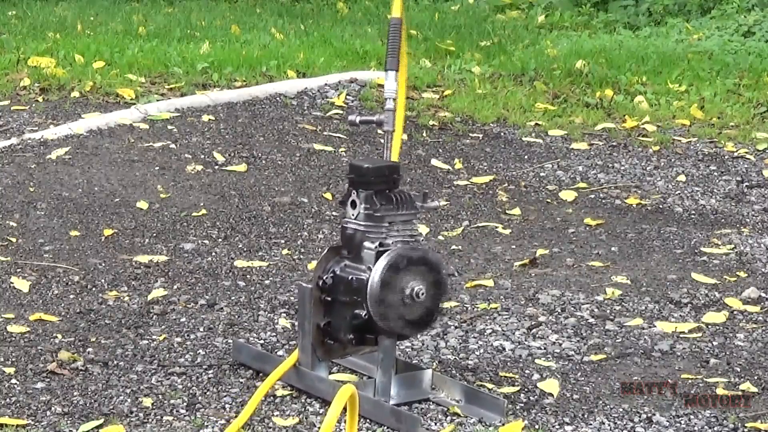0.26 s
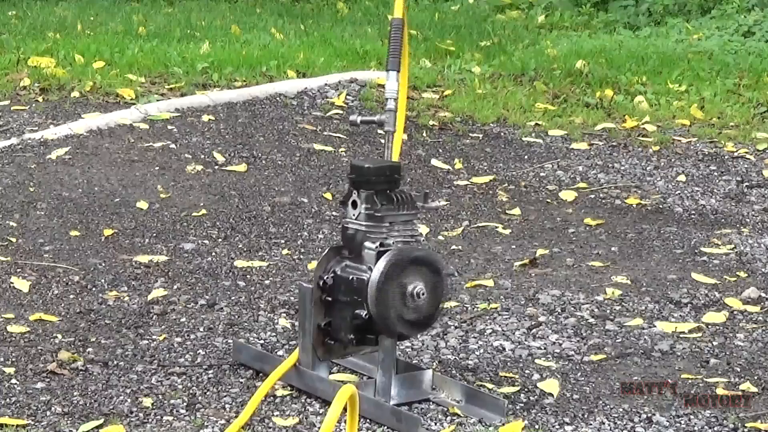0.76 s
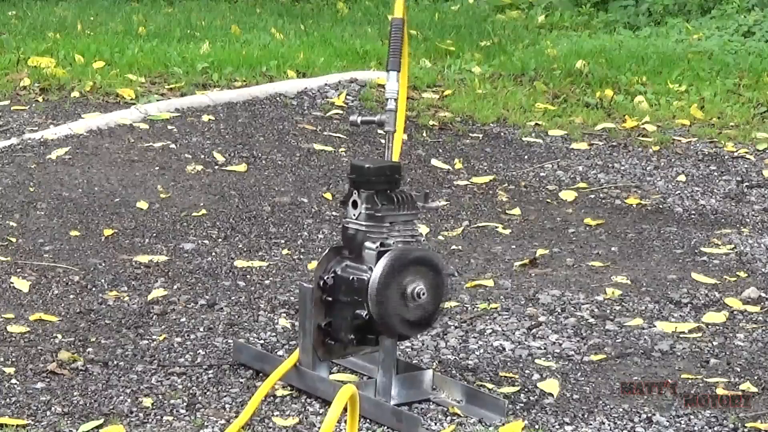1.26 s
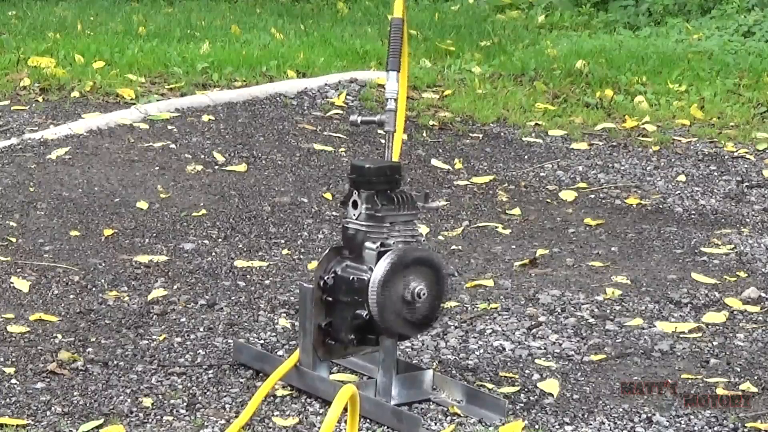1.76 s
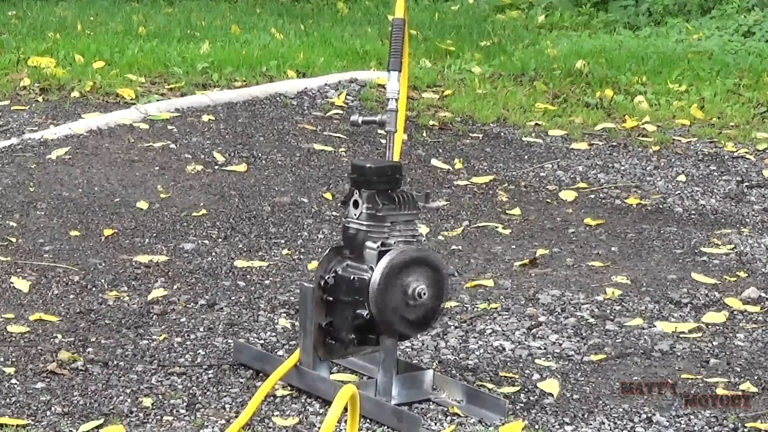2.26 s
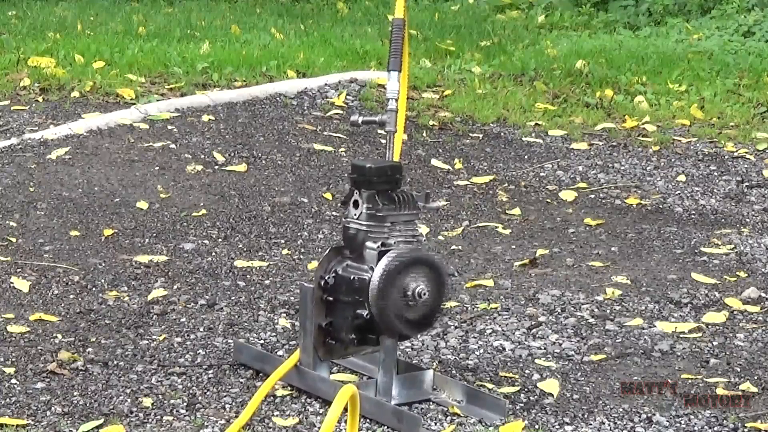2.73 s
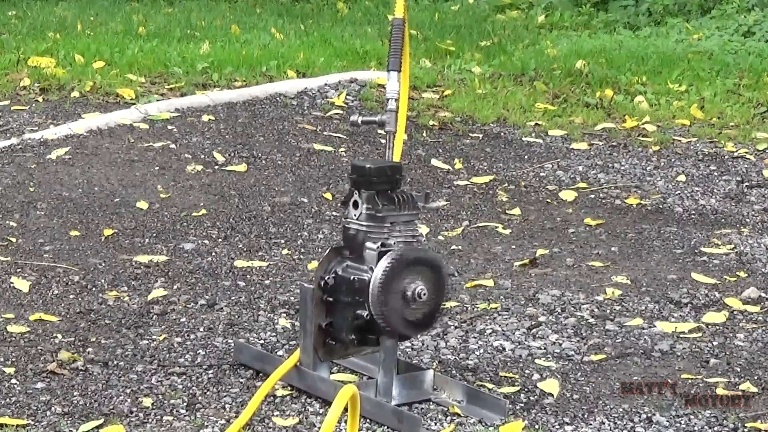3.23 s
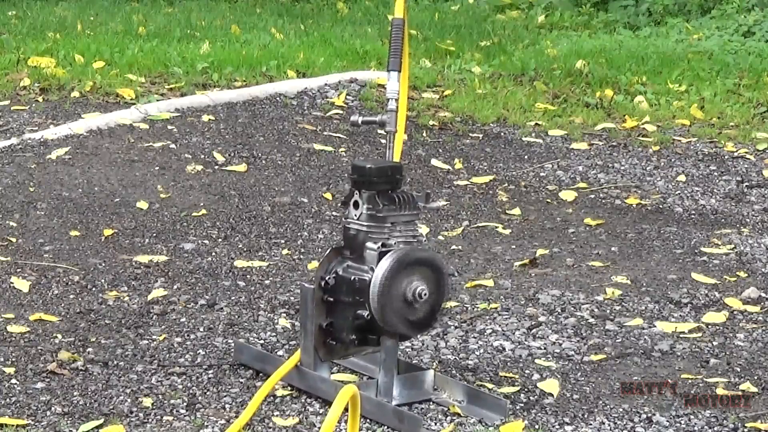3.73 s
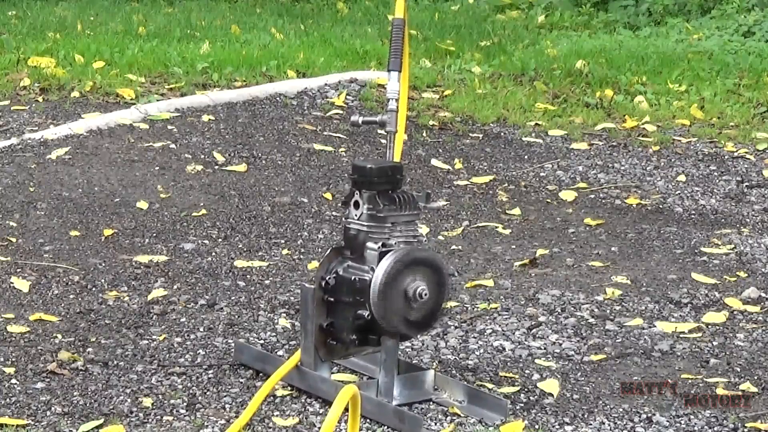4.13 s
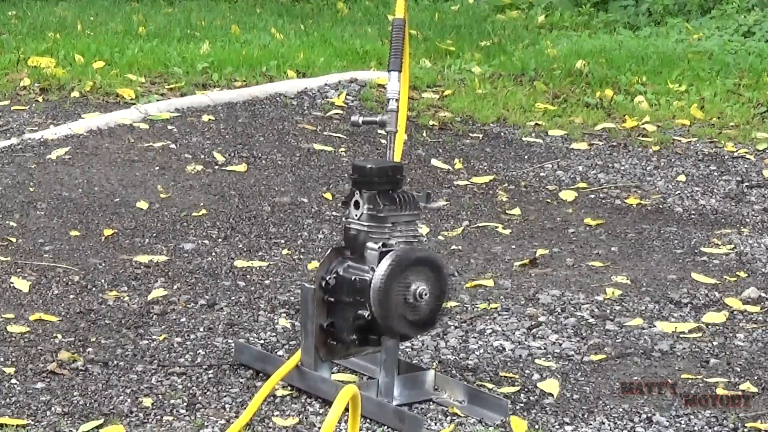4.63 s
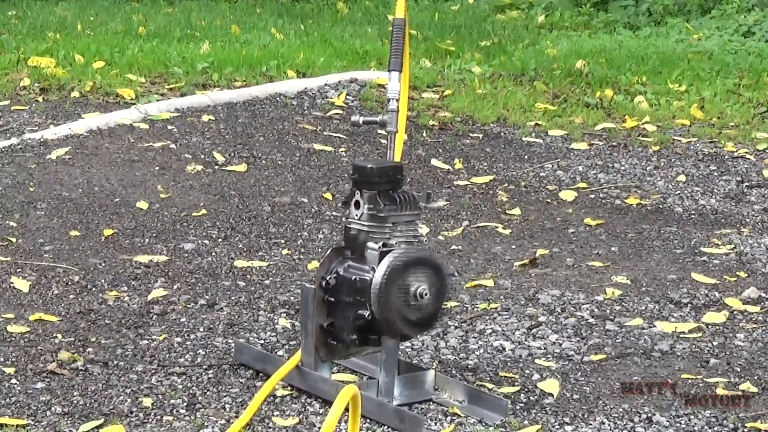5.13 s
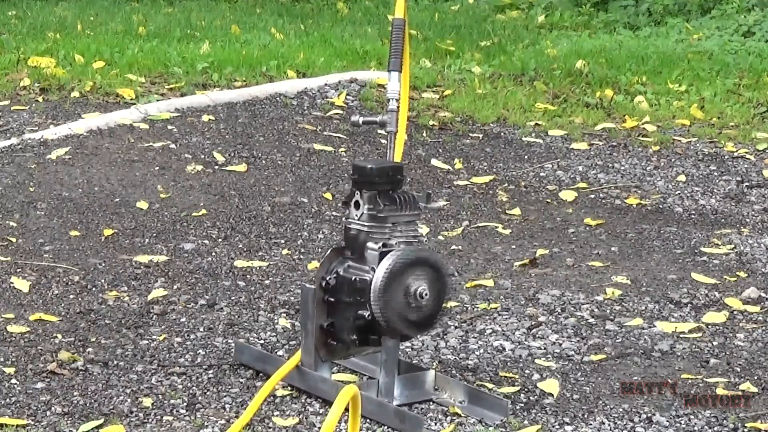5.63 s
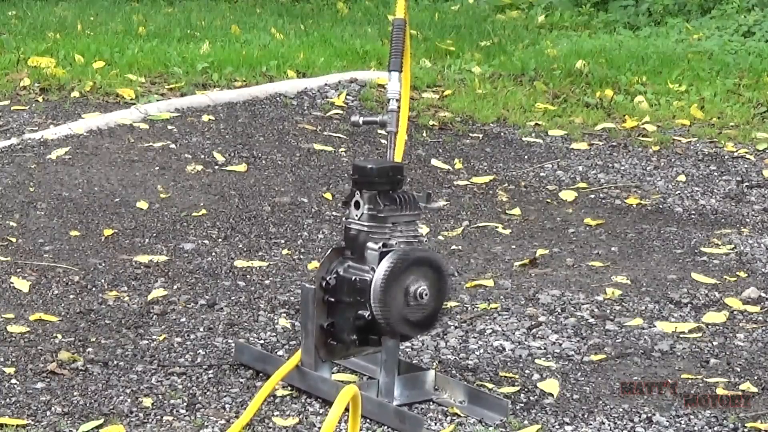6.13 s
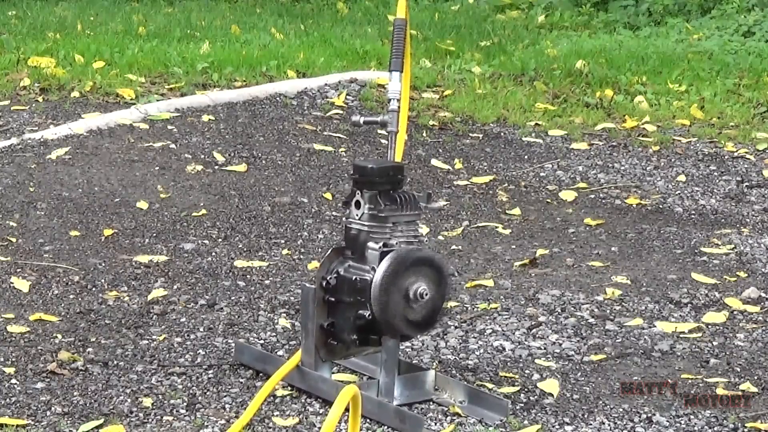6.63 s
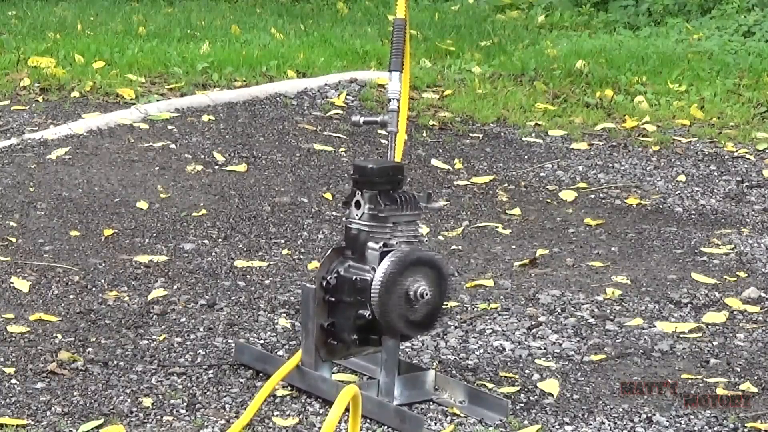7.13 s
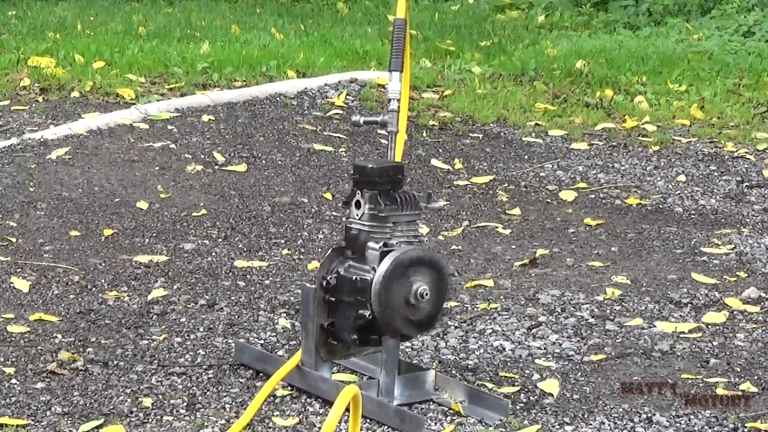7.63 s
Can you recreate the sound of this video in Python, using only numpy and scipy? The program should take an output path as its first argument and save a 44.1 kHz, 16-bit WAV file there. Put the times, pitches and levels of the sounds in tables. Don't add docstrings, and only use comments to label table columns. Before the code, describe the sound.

Sharp, raspy blasts of air pulse from a little one-cylinder engine, recorded close in stereo outdoors. At first the puffs are slower, deeper and more separate, about seven to ten a second; they quicken to around fifteen and become lighter and tighter. Sizzling leakage, tiny whistles, metallic ringing and dull valve ticks fill the gaps. Slight reflections, little reverberation, and distant machinery murmurs underneath.

```python
import sys
import numpy as np
from scipy import signal
from scipy.fft import rfft, irfft
from scipy.io import wavfile
from scipy.ndimage import uniform_filter1d

SR = 44100
rng = np.random.default_rng(int(sys.argv[2]) if len(sys.argv) > 2 else 0)


def ratio(d):
    e = np.asarray(d, float) / 20
    return 10 ** e


def to_wav(s):
    ch = np.atleast_2d(s).T
    pcm = np.round(np.clip(ch, -1, 1) * 32767)
    wavfile.write(sys.argv[1], SR, pcm.astype(np.int16))


N = 347508
T = np.arange(N) / SR
TURN_COUNT = 60

# time [s], speed [turns/s].
SPEED = [(0, 5.036), (.13, 3.435), (.22, 3.212), (.36, 4.401), (.5, 4.298), (.65, 4.839), (.9, 5.628),
         (1.2, 6.067), (1.55, 6.398), (3.15, 6.377), (3.5, 7.009), (3.8, 7.523), (4.4, 7.651), (5.6, 7.725),
         (6.7, 7.663), (7.2, 7.825), (7.88, 8.457)]
# lead [turns], lag [turns], rise [turns], fall [turns], top [dB].
CYLINDER_EDGE = (0, 0.02, 0.05, 0.06, -3.5)
# growth [dB], dip [dB], dip place [0-1], between puffs [dB],
# after both [dB], dying tail [dB].
CYLINDER_BODY = (4.5, -0.7, 1, -21, -35, -19)


def evened(x):
    return x / np.sqrt(np.mean(x ** 2) + 1e-20)


def colour(x, gain):
    hz = np.abs(np.fft.fftfreq(16384, 1 / SR))
    log_gain = np.log(gain(hz) + 1e-4)
    taps = np.fft.ifft(np.exp(np.conj(signal.hilbert(log_gain)))).real[:8192]
    return signal.oaconvolve(x, taps / np.linalg.norm(taps))[:len(x)]


def slopes(points):
    f, level = np.transpose(points)
    return lambda hz: ratio(np.interp(np.log(hz + 1), np.log(f + 1), level))


def modes(rows, steep=1.74):
    def gain(hz):
        power = 0
        for f, width, db in rows:
            power = power + ratio(2 * db) / (1 + (2 * (hz - f) / width) ** 2) ** steep
        return np.sqrt(power)
    return gain


def resonate(x, hz, width_hz):
    turn = np.exp(2j * np.pi * np.cumsum(hz) / SR)
    r = np.exp(-np.pi * width_hz / SR)
    return 2 * (turn * signal.lfilter([1 - r], [1, -r], x / turn)).real


def turbulence(level_db, eddy_db, eddy_s, spit_db=2.0):
    white, eddies = rng.standard_normal((2, N))
    size = max(round(eddy_s * SR), 2)
    eddies = evened(uniform_filter1d(uniform_filter1d(eddies, size), size))
    grains = evened(uniform_filter1d(rng.standard_normal(N), size=12))
    return evened(white * ratio(spit_db * grains) * ratio(eddy_db * eddies)) * ratio(level_db)


def cam():
    start_turns = .104
    return start_turns + np.cumsum(np.interp(T, *np.transpose(SPEED))) / SR


def slowness():
    full_speed_turn_s = 0.126
    return np.maximum(1 / (np.interp(T, *np.transpose(SPEED)) * full_speed_turn_s) - 1, 0)


def per_turn(mean_db, scatter_db):
    scatter = rng.standard_normal(TURN_COUNT)
    return mean_db + scatter_db * np.interp(cam(), np.arange(TURN_COUNT) + .5, scatter)


def gusts(depth_db=.7, gust_s=.004):
    size = round(gust_s * SR)
    return depth_db * evened(uniform_filter1d(uniform_filter1d(rng.standard_normal(N), size), size))


def roar():
    # time [s], level [dB].
    labour = [(0, 9), (.4, 8.5), (1.0, 7.5), (1.3, 4.5), (2.9, 5.5), (3.5, 2.5), (5, -0.7), (6.4, .3),
              (7.88, -3)]
    return per_turn(np.interp(T, *np.transpose(labour)), scatter_db=1.2)


def flow(edge, body, contrast=0.35, empty_db=-5, tire_db=0):
    puff_rows = [
        (0.001, 0.259, 0.00087, 0.043, 0.75),
        (0.46, 0.752, -0.012, .001, 1.26),
    ]
    dip_width, tail_db_per_turn, slow_knee, slow_edge = .16, -93, 0.11, 0.62
    lead, lag, rise, fall, top_db = edge
    growth_db, dip_db, dip_at, gap_db, shut_db, tail_db = body
    place, slow = (cam() + .1) % 1 - .1, slowness()
    dragged, sharp = np.tanh(slow / slow_knee), 1 + slow_edge * slow
    between = (place > .12) & (place < .6)
    gain = ratio(np.where(between, gap_db + empty_db * slow, shut_db))
    for opens, shuts, early, late, share in puff_rows:
        start = opens + share * lead / sharp + early * dragged
        end = shuts + lag + late * dragged
        u = (place - start) / (end - start)
        tired_db = tire_db * dragged * np.clip(u / dip_at, 0, 1) * (share < 1)
        dip = np.exp(-.5 * ((u - dip_at) / dip_width) ** 2)
        top = ratio(top_db + tired_db + growth_db * (u - .5) + share * dip_db * dip)
        tail = ratio(tail_db + tail_db_per_turn * np.maximum(place - end, 0))
        gain = gain + (place > end - fall) * tail
        opening = np.clip((place - start) * sharp / rise, 0, 1)
        closing = np.clip((end - place) * sharp / fall, 0, 1)
        gain = gain + (top - gain) * opening * closing
    return 20 * np.log10(gain) * (1 + contrast * slow)


def rumble():
    # frequency [Hz], density [dB per Hz].
    wash = [(13, -54), (22, -27), (48, -11), (80, -11.5), (114, -2), (213, -9.5), (244, -4), (280, -8.5),
            (385, 0), (420, -3.5), (550, -23), (920, -120)]
    start_db, end_db, fade_s = -43.5, -51.5, 2.5
    both, left, right = (colour(row, slopes(wash)) for row in rng.standard_normal((3, N)))
    level_db = end_db + (start_db - end_db) * np.exp(-T / fade_s) + 3.5
    return ratio(level_db) * (both + 0.081 * np.array([left, right]))


def hum():
    # frequency [Hz], level [dB].
    lines = [(120, -58), (161, -58), (240, -59), (400, -59)]
    out = np.zeros(N)
    for hz, db in lines:
        out += ratio(db) * evened(resonate(rng.standard_normal(N), np.full(N, hz), width_hz=4.7))
    return out


def yard(x):
    # delay [ms], left [dB], right [dB].
    echoes = [(1.07, -19, -12.5), (1.89, -52, -47), (5.46, -59, -29), (7.85, -36, -7.5), (10.5, -30, -33),
              (11.7, -11, -16.5)]
    # frequency [Hz], level [dB].
    tail_colour = [(100, -28), (380, -19.5), (700, -14), (1300, -5), (2400, -12), (4400, -11.5),
                   (8000, -13), (12000, -21)]
    t60_s, slot = 0.4, 22
    slots = np.arange(120, 13000, slot)
    shape = (2, len(slots))
    tail = np.zeros((2, 13100))
    places = slots + rng.integers(0, slot, shape)
    np.put_along_axis(tail, places, rng.choice([-1., 1.], shape), axis=1)
    tail *= ratio(-60 * T[:tail.shape[1]] / t60_s)
    tail /= np.linalg.norm(tail[0])
    for ms, *side_db in echoes:
        tail[:, round(ms * SR / 1000)] = ratio(np.array(side_db) + 6)
    wet = signal.oaconvolve(x[None], tail, axes=1)[:, :N]
    return x + irfft(rfft(wet) * slopes(tail_colour)(np.fft.rfftfreq(N, 1 / SR)), N)


def knocks():
    # place [0-1 turn], level [dB], frequency [Hz], t60 [s].
    landings = [
        (.29, -30.5, 231, .014),
        (.42, -41, 230, 0.011),
        (.765, -32, 233, 0.017),
        (.985, -31.5, 300, 0.011),
    ]
    spits_db = [-48, -46, -32, -29]
    out, t, turns = np.zeros(N), T[:1300], cam()
    chance = rng.standard_normal((TURN_COUNT, len(landings)))
    bright = evened(np.diff(rng.standard_normal(N + 1)))
    for k, (place, db, hz, t60) in enumerate(landings):
        hits = np.flatnonzero(np.diff(np.floor(turns - place)) > 0)
        blows = np.zeros(N)
        blows[hits] = ratio(2.0 * chance[:len(hits), k])
        thud = np.sin(2 * np.pi * hz * t) * ratio(db - 60 * t / t60)
        out += signal.oaconvolve(blows, thud)[:N]
        out += bright * signal.oaconvolve(blows, ratio(spits_db[k] - 60 * t / 0.049))[:N]
    return out


def casting(air):
    # frequency [Hz], level over the passing air noise [dB].
    fin_modes = [(642, -4), (896, -9), (1080, -1), (1611, -8), (1754, -3), (2030, 1.5), (2207, 3),
                 (2287, -10), (2356, -4), (2479, -3.5), (2615, -4.5), (3062, 0.5), (3343, -2.5),
                 (3706, -27), (4759, -10), (5071, -24), (5331, -14), (5430, -4), (5721, -21), (6286, 2.5),
                 (6724, -11), (8312, -8), (9114, -7), (11149, -1)]
    width_hz, t = 18, T[:4400]
    ring = sum(ratio(db) * np.cos(2 * np.pi * hz * t) for hz, db in fin_modes)
    ring = ring * np.exp(-np.pi * width_hz * t)
    return signal.oaconvolve(air, ring * 2 * np.pi * width_hz / SR)[:N]


def whistles():
    # place [0-1 turn], length [turns], frequency [Hz], width [Hz], level [dB].
    gaps = [(0.38, 0.023, 7240, 380, -30.5), (0.03, 0.016, 12000, 300, -34), (.73, 0.025, 1960, 250, -26.5),
            (0.84, 0.022, 1620, 130, -32.5), (0.32, 0.034, 3270, 92, -28), (0.9, 0.053, 3230, 130, -35)]
    place, out = cam() % 1, np.zeros(N)
    drift = 1 + 0.04 * evened(uniform_filter1d(rng.standard_normal(N), size=9000))
    for at, length, hz, width, db in gaps:
        note = evened(resonate(rng.standard_normal(N), hz * drift, width))
        swell = np.exp(-.5 * ((place - at) / length) ** 2)
        out += ratio(db - 6.0 * slowness()) * swell * note
    return out


def leak(gust_db):
    # frequency [Hz], density [dB per Hz].
    dull_colour = [(250, -18.5), (450, -9.5), (900, -3), (1400, -1.5), (2200, -0.5), (3100, 0),
                   (4000, -0.5), (5300, 1.5), (6500, -1), (8000, -8), (10000, -34.5)]
    sizzle_colour = [(4000, -12), (6000, -13), (7400, -6), (8400, -1), (9200, 1), (10200, -3),
                     (11300, -2.5), (12500, -6.5), (14000, -12.5), (15800, -18.5)]
    seat_edge = (-0.044, 0.022, 0.029, 0.039, -0.62)
    seat_body = (-1, -2, .5, -3.5, -7.5, -25)
    dull_level_db, sizzle_level_db = -22, -25.5
    seat_db = flow(seat_edge, seat_body, contrast=0.25, empty_db=-7, tire_db=-0.86)
    leak_db = per_turn(mean_db=-1.02, scatter_db=1)
    dull_db = 0.77 * seat_db + leak_db + dull_level_db
    sizzle_db = 0.92 * seat_db + 0.67 * leak_db + 0.54 * gust_db + sizzle_level_db
    dull = turbulence(dull_db, eddy_db=1.5, eddy_s=0.006)
    sizzle = turbulence(sizzle_db, eddy_db=1.66, eddy_s=0.0078)
    return colour(dull, slopes(dull_colour)) + colour(sizzle, slopes(sizzle_colour))


def hollow(roar_db):
    # place in a half turn [0-1], frequency [Hz].
    cavity = [(0, 330), (.15, 413), (.4, 597), (.55, 756), (1, 510)]
    width_hz, hollow_db = 430, -38
    hz = np.interp(2 * cam() % 1, *np.transpose(cavity))
    drive_db = 0.72 * flow(CYLINDER_EDGE, CYLINDER_BODY) + 0.98 * roar_db
    drive = turbulence(drive_db, eddy_db=3.0, eddy_s=0.007, spit_db=1.5)
    return ratio(hollow_db) * evened(resonate(resonate(drive, hz, width_hz), hz, width_hz))


def puffs(gust_db, roar_db):
    # frequency [Hz], width [Hz], level [dB].
    port_modes = [(2120, 120, -8), (2643, 590, 3), (3050, 250, -4), (3727, 450, -2.5)]
    throat_modes = [(4903, 510, -1.5), (5310, 400, 0), (5780, 590, 2.5), (6290, 330, -5), (8700, 230, -21)]
    cylinder_modes = [(655, 142, 0), (902, 110, 2), (1073, 85, -1), (1680, 830, -12)]
    port_edge = (0.0043, -0.0173, 0.0526, 0.0668, -2)
    port_body = (0.5, -1.04, 0.6, -20, -29, -16)
    throat_edge = (-0.019, 0.015, 0.026, 0.042, -1.1)
    throat_body = (-3.5, -4.5, 0.33, -13, -20, -38)
    # place in a half turn [0-1], frequency [Hz].
    lift = [(0, 2460), (.15, 2510), (.3, 2720), (.45, 2490), (.55, 2080), (1, 2390)]
    lift_width_hz, lift_db = 290, 8.5
    port_level_db, throat_level_db, cylinder_level_db = -21.5, -19, -32.5
    jet_db = per_turn(mean_db=0.64, scatter_db=0.63) + gust_db
    port_db = flow(port_edge, port_body) + jet_db + port_level_db
    throat_db = flow(throat_edge, throat_body, contrast=0.64, tire_db=-1.5) + jet_db + throat_level_db
    cylinder_db = flow(CYLINDER_EDGE, CYLINDER_BODY) + 0.33 * roar_db + cylinder_level_db
    port = turbulence(port_db, eddy_db=.8, eddy_s=.002)
    throat = turbulence(throat_db, eddy_db=.6, eddy_s=.002)
    cylinder = turbulence(cylinder_db, eddy_db=1.3, eddy_s=.004)
    lift_hz = np.interp(2 * cam() % 1, *np.transpose(lift))
    out = ratio(lift_db) * resonate(port, lift_hz, lift_width_hz)
    out += colour(port, modes(port_modes)) + colour(throat, modes(throat_modes))
    return out + colour(cylinder, modes(cylinder_modes))


def scene():
    # frequency [Hz], left minus right [dB].
    lean_rows = [(60, -0.5), (150, -0.5), (380, -1), (950, 1), (2380, -1.5), (5980, 0.0), (15000, -0.5)]
    gust_db, roar_db = gusts(), roar()
    air = puffs(gust_db, roar_db) + hollow(roar_db) + leak(gust_db) + whistles()
    mix = yard(air + casting(air) + knocks()) + rumble() + hum()
    lean = slopes(lean_rows)(np.fft.rfftfreq(N, 1 / SR)) ** np.array([[.5], [-.5]])
    return irfft(rfft(mix) * lean, N)


def roll_off(x):
    return signal.sosfilt(signal.butter(12, 15870, fs=SR, output="sos"), x)


def record(dry):
    ceiling, bass_hz, edge_hz = .9, 55, 15850
    rounded = ceiling * np.tanh(dry / ceiling)
    x = signal.sosfilt(signal.butter(2, bass_hz, "high", fs=SR, output="sos"), rounded)
    band_limit = signal.firwin(511, edge_hz, window=("kaiser", 9), fs=SR)
    x = signal.oaconvolve(x, band_limit[None], "same")
    return roll_off(x)


dry = scene()
out = record(dry)
to_wav(out)
```